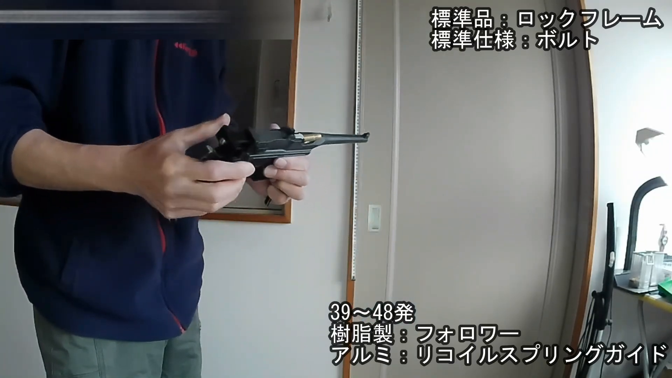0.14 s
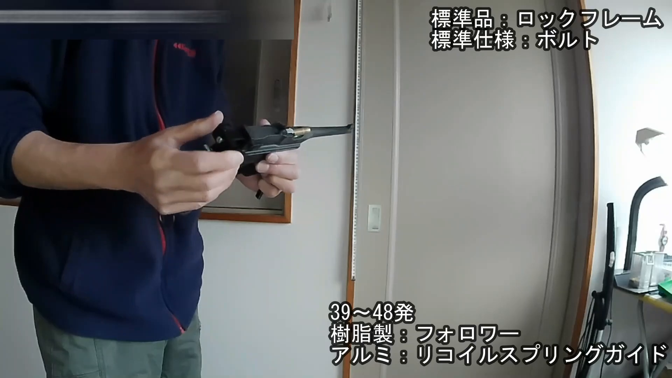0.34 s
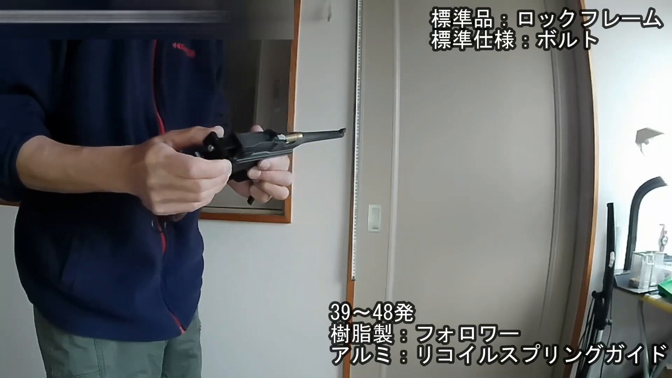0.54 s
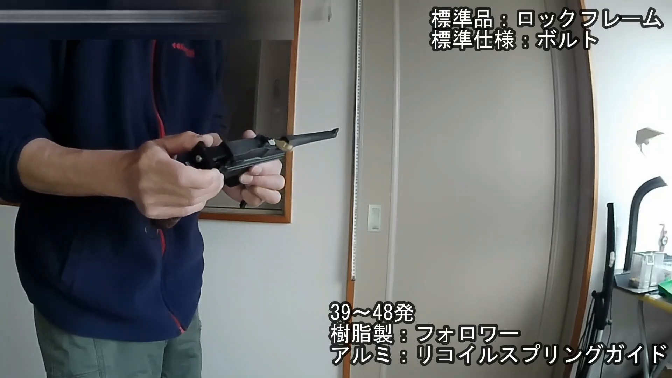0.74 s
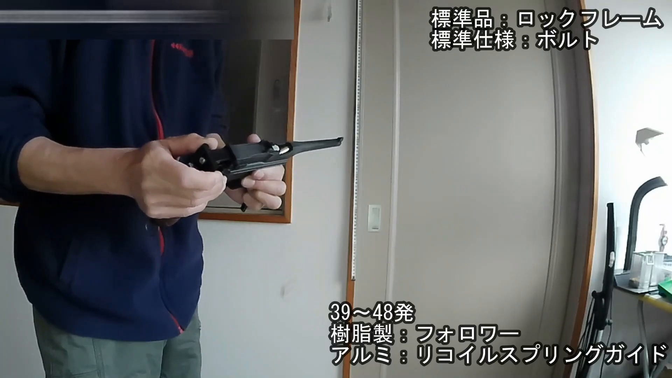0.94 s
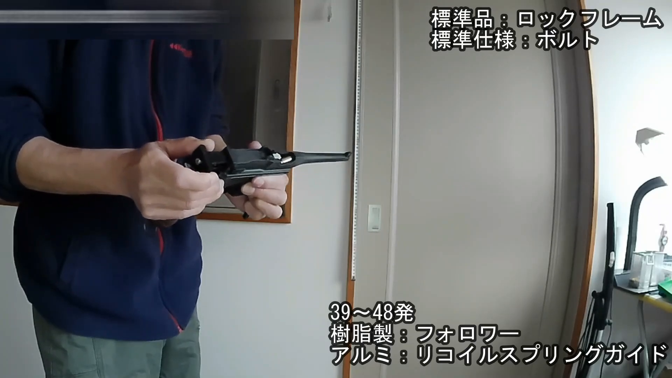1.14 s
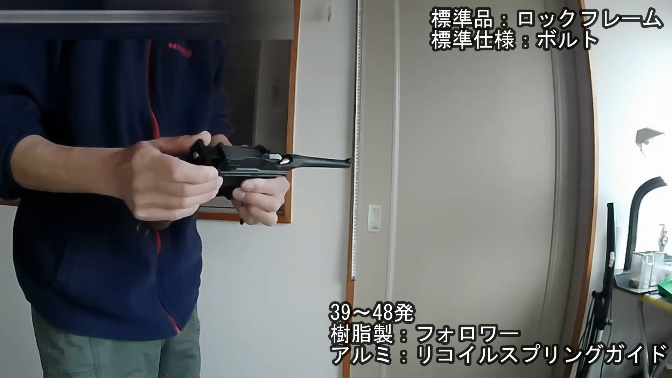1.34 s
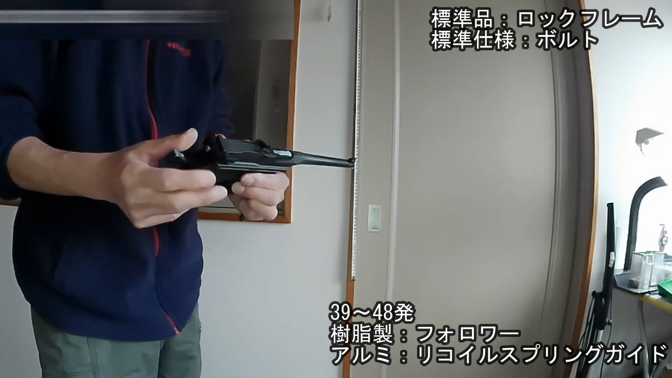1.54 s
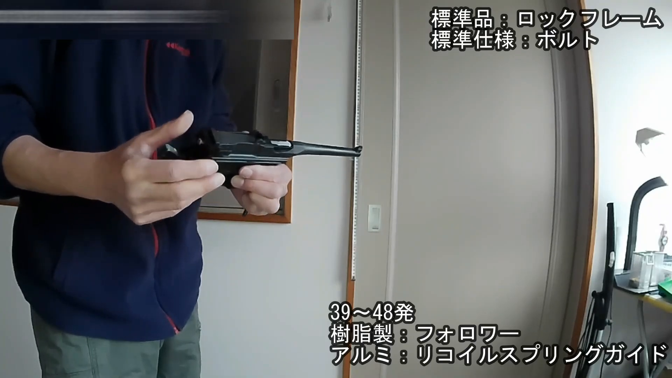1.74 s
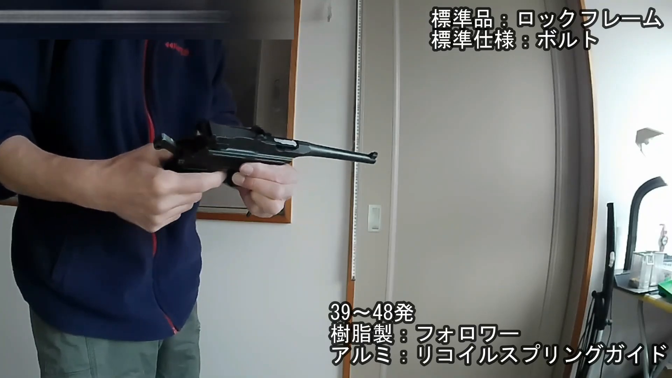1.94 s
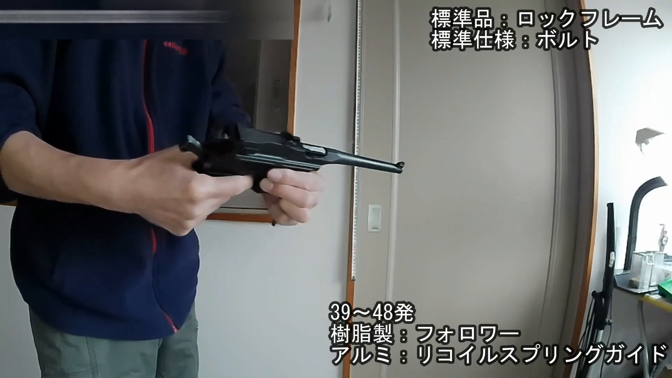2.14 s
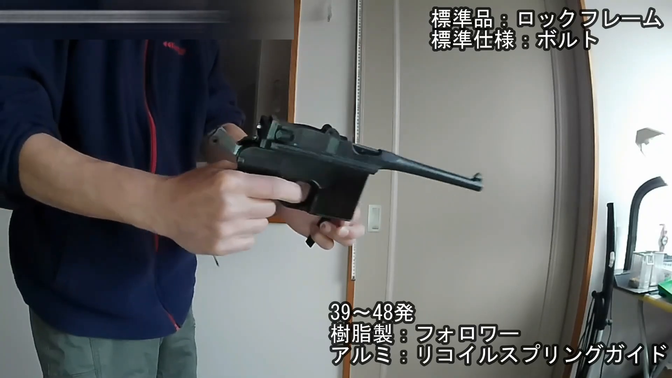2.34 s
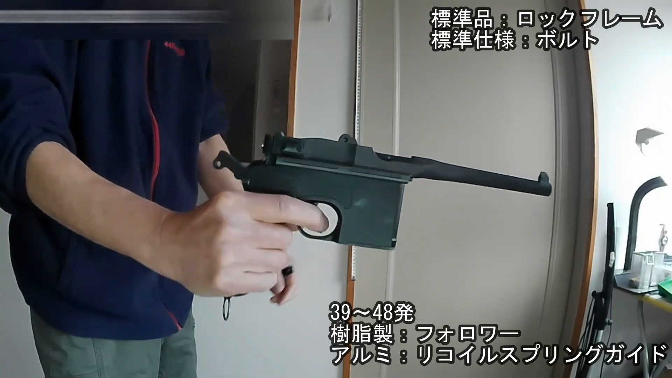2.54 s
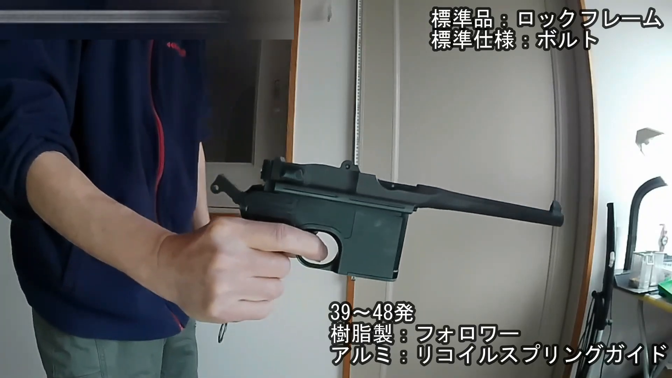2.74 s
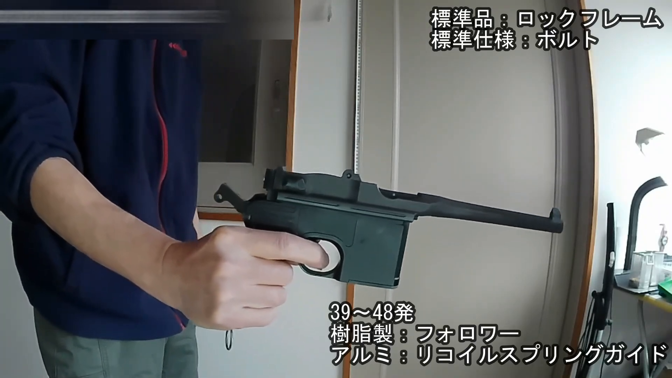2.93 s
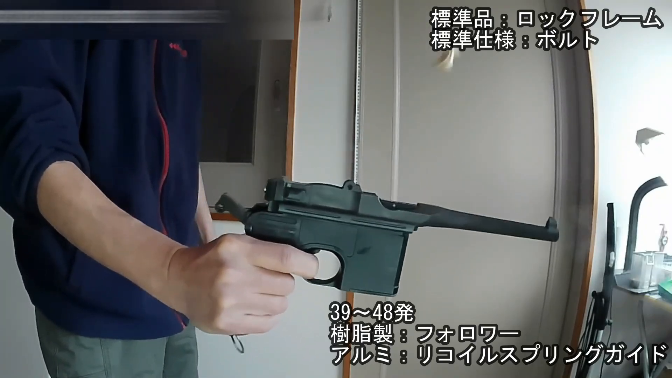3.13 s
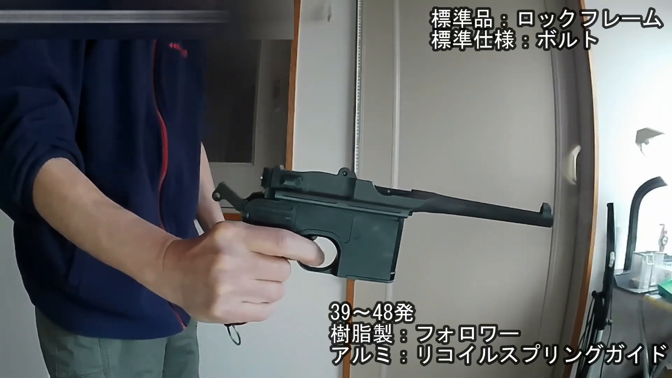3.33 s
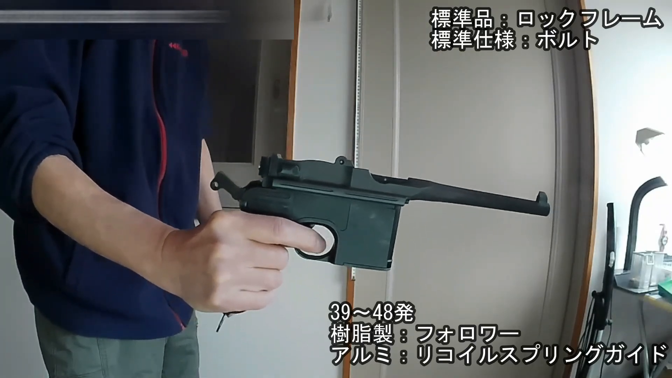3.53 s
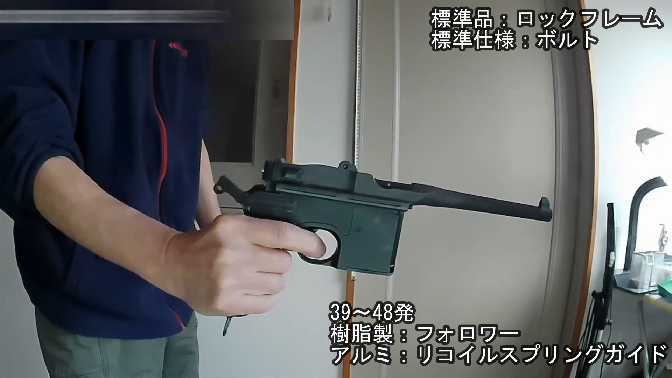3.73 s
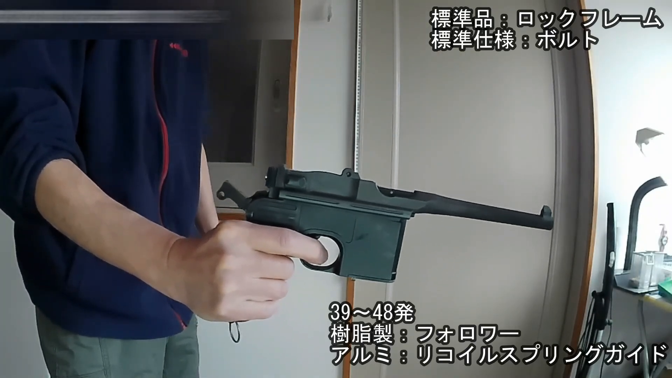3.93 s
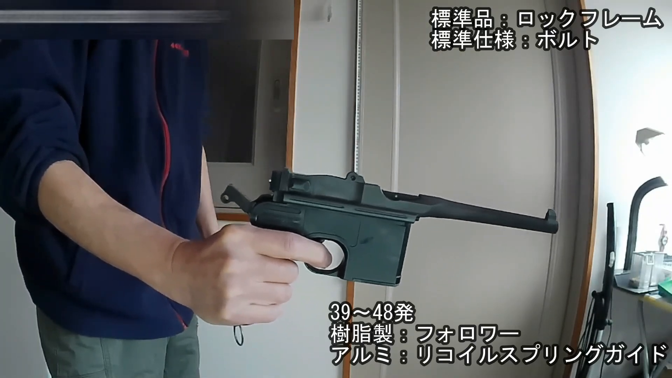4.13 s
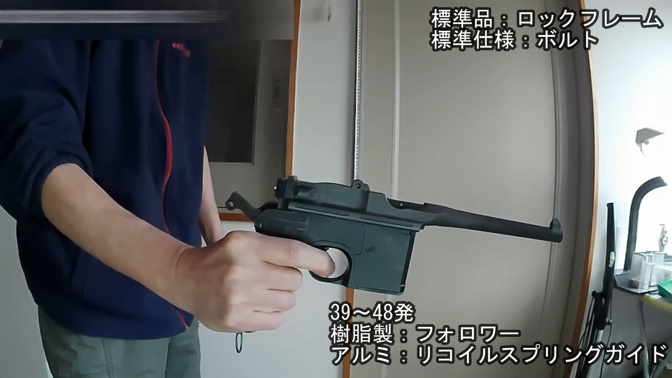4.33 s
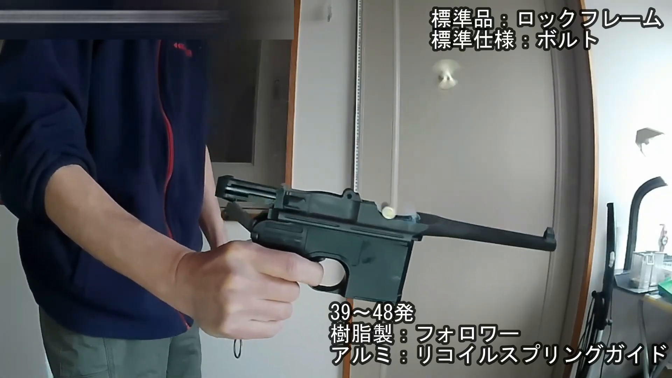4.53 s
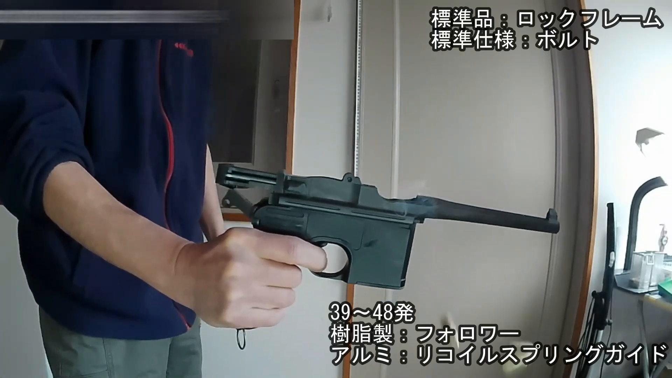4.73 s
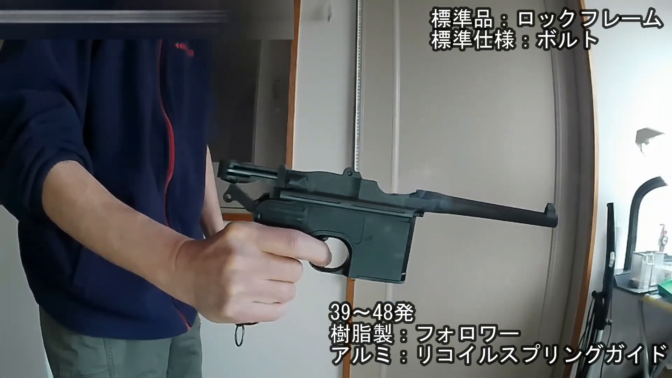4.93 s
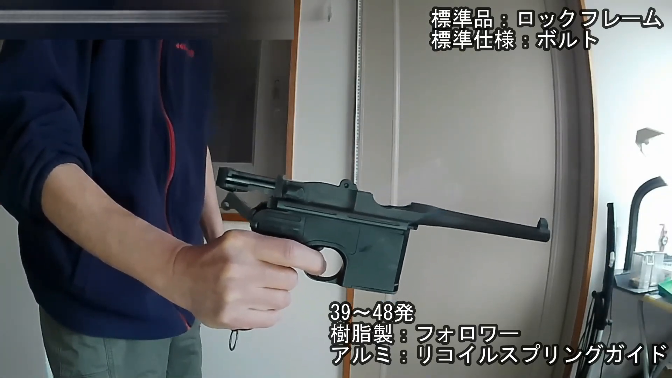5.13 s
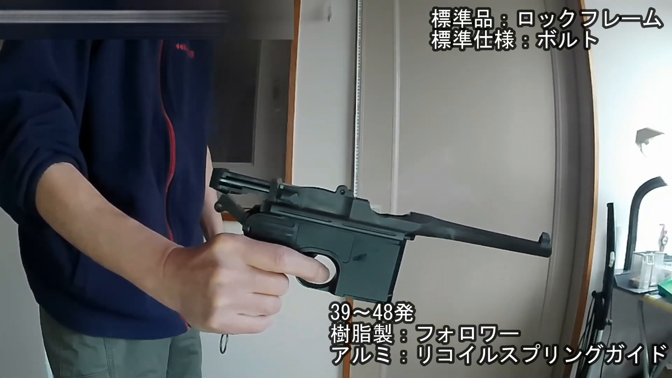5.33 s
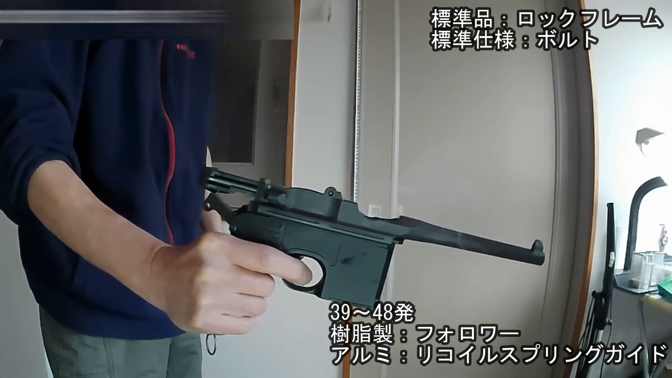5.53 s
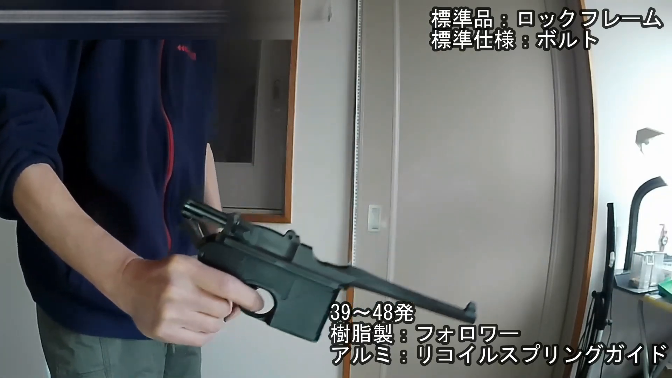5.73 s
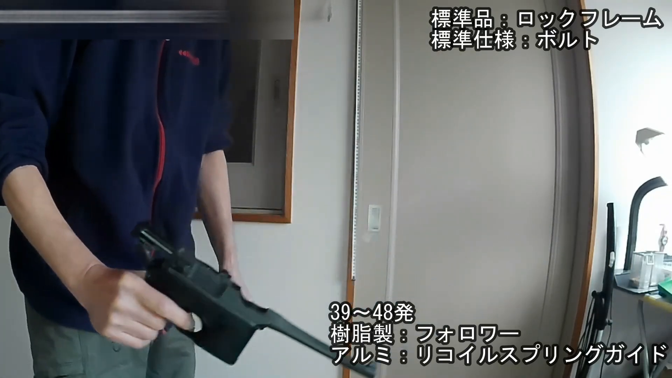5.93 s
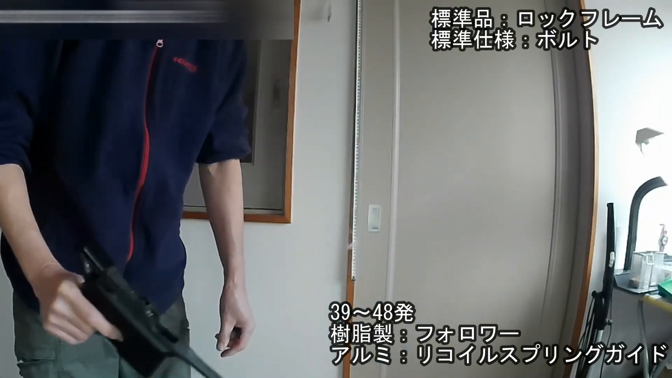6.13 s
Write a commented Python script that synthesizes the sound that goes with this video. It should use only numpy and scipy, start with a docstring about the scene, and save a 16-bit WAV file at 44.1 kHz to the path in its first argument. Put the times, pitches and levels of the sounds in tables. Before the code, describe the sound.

Close in a small furnished room, fingers tap and click over a metal pistol amid soft cloth rustle. The bolt clacks hard, pauses, scrapes lightly and snaps again. Two loud, abrupt bangs follow over a second apart, clipping the microphone and leaving a short room tail with a faint ringing panel. Light case impacts follow each shot, the second landing being a fuller clatter on floorboards.

```python
"""A cap-firing model pistol fires twice in a small furnished room: decaying gas noise and a slow pressure
push overload the microphone, the shock front fills the room and a panel rings on.
Before that the pistol is handled and cocked: fingers, bolt and hammer strike the damped modes of its body.
The ejected case lands and bounces, exciting the modes of the floor boards.
Cloth rustles as grainy noise over a low room rumble of filtered noise."""
import sys
import numpy as np
from scipy import signal
from scipy.fft import rfft, irfft, next_fast_len
from scipy.io import wavfile

SR = 44100
rng = np.random.default_rng(int(sys.argv[2]) if len(sys.argv) > 2 else 0)


def wrap_up_sound(samples):
    """Save the sound to the file named by the first command line argument, as 16-bit audio."""
    columns = np.atleast_2d(samples).T
    # keep every value between -1 and 1, then stretch to whole-number steps
    tamed = np.clip(columns, -1, 1)
    steps = np.round(tamed * 32767).astype(np.int16)
    wavfile.write(sys.argv[1], SR, steps)


def elevation(decibels):
    """Turn decibel levels (scalar or array-like) into linear amplitude ratios."""
    levels = np.asarray(decibels, float)
    return 10 ** (levels / 20)


N = 272097

# the two shots: (time [s], blast level [dB])
SHOTS = [(3.0622, 25), (4.4219, 23)]
# spectrum of the blast: (frequency [Hz], relative level per Hz [dB])
BLAST_SPECTRUM = [(35, -53.5), (60, -32), (113, -24), (189, -15.5), (371, -6.5), (700, -1.5), (1200, 0),
                  (2090, -10), (3200, -16.5), (5460, -16), (10000, -34.5), (16000, -53.5)]
# modes of the pistol's body: (frequency [Hz], relative level [dB], decay time T60 [s])
BODY_MODES = [(190, 5.5, 0.016), (272, -4.5, 0.02), (388, -8.5, 0.0061), (930, -6, 0.012),
              (1193, 0.5, 0.023), (1314, 1, 0.022), (1432, -2, 0.013), (2060, 5.5, 0.0042),
              (2350, -2.5, 0.017), (2720, -2.5, 0.011), (4500, 15.5, 0.002), (5380, -5, 0.022),
              (6940, 2.5, 0.0048), (8000, -2, 0.0026), (10300, -5.5, .004), (13200, -10, 0.0033),
              (15300, -7, .003)]
# fingers work the pistol's parts: (time [s], knock level [dB], pitch of the part touched [Hz],
# brightness = clack over knock [dB], tick level [dB])
TOUCHES = [(0.082, -32, 1200, -17.5, -71), (0.1, -24.5, 1314, -26, -59), (0.143, -34, 1430, -15.5, -49.5),
           (0.163, -36.5, 2720, 3.5, -40.5), (0.325, -41, 2720, -5, -56), (0.563, -32.5, 1430, -12, -57.5),
           (0.583, -17.5, 1380, -20, -56), (0.611, -36.5, 1370, -15, -68), (0.653, -12, 930, 1.5, -43.5),
           (0.688, -38, 2720, 8.5, -54), (0.698, -50, 2720, -12, -49), (0.758, -33, 1194, -15, -62),
           (0.783, -32, 1500, 0, -49.5), (0.826, -28.5, 1500, -2, -60), (1.03, -29, 1340, -6, -53),
           (1.045, -45, 2400, 4, -65), (1.903, -35, 1090, -34, -85), (2.294, -25, 1090, -10, -53),
           (2.343, -49.5, 2410, 4, -54), (2.395, -24.5, 1010, -12, -54), (2.64, -36, 1200, -20, -53.5)]
# highest mode of each group
THUD_HZ, KNOCK_HZ, CLACK_HZ, TICK_HZ = 600, 1700, 3200, 20000


def one(x):
    """Normalisation to unit root-mean-square value."""
    return x / np.sqrt(np.mean(x ** 2) + 1e-20)


def at_hz(points, hz):
    """Interpolation of a frequency table on a logarithmic frequency axis."""
    table = np.array(points)
    return np.interp(np.log(hz + 1), np.log(table[:, 0]), table[:, 1])


def colour(x, points):
    """Minimum-phase filtering: folding the cepstrum makes the given spectrum causal."""
    size = next_fast_len(N + SR)
    gain = elevation(at_hz(points, np.fft.rfftfreq(size, 1 / SR)))
    cepstrum = irfft(np.log(gain), size)
    cepstrum[1:size // 2] *= 2
    cepstrum[size // 2 + 1:] = 0
    response = np.exp(rfft(cepstrum))
    return irfft(rfft(x, size) * response, size)[:N]


def clicks(times, db):
    """Ideal impulses: each places its whole force in one sample."""
    out = np.zeros(N) + 1e-18
    out[np.round(np.array(times) * SR).astype(int)] = elevation(db)
    return out


def ring(x, hz, t60):
    """Damped resonator: a unit impulse starts a decaying sine of height 1."""
    radius = elevation(-60 / (t60 * SR))
    angle = 2 * np.pi * hz / SR
    return signal.lfilter([0, np.sin(angle)], [1, -2 * radius * np.cos(angle), radius ** 2], x)


def gas_hiss(burn_s):
    """Turbulent jet noise: burning cap gas hisses at the microphone and dies exponentially."""
    t = np.arange(N) / SR
    envelope = np.zeros(N)
    for s, db in SHOTS:
        age = np.maximum(t - s, 0)
        envelope += elevation(db) * (t > s) * np.exp(-age / burn_s)
    return envelope * one(colour(rng.standard_normal(N), BLAST_SPECTRUM))


def pressure_push(push_db, push_s):
    """Blast-wave pressure: a slow positive push swings back below zero and recovers."""
    t = np.arange(N) / SR
    push = np.zeros(N)
    for s, db in SHOTS:
        age = np.maximum(t - s, 0) / push_s
        push += elevation(db + push_db) * age * (2 - age) * np.exp(-age)
    return push


def shock_front(front_db):
    """Impulsive shock radiation: one coloured click per shot, which excites the room."""
    return elevation(front_db) * colour(clicks(*np.transpose(SHOTS)), BLAST_SPECTRUM)


def panel_hum():
    """Modal resonance: a panel in the room, struck by each blast, rings on."""
    # modes of the panel: (frequency [Hz], level relative to the blast [dB], decay time T60 [s])
    panel_modes = [(895, -67, 1.8), (851, -57, .6), (1476.5, -56, .6), (1570, -64, .6)]
    blast = clicks(*np.transpose(SHOTS))
    return sum(ring(blast * elevation(db), hz, t60) for hz, db, t60 in panel_modes)


def strike(blows, modes, thud_db, knock_db, clack_db, tick_db, rattle_s, focus_db=np.zeros((0, 1))):
    """Modal excitation: soft contact moves low modes, hard points rattle on high ones; gives body, tick."""
    s, knock, thud, clack, tick = np.transpose(blows)
    # every blow strikes the modes with fresh strengths
    spread = rng.normal(0, 2.5, (len(s), len(modes)))
    spread[:len(focus_db)] += focus_db
    groups = [thud + thud_db, knock + knock_db, clack + clack_db, tick + tick_db]
    top = [THUD_HZ, KNOCK_HZ, CLACK_HZ, TICK_HZ]
    out = np.zeros((len(top), N))
    fade = np.exp(-1 / (rattle_s * SR))
    for k, (hz, level_db, t60) in enumerate(modes):
        group = np.searchsorted(top, hz)
        force = clicks(s, groups[group] + level_db + spread[:, k])
        if hz > CLACK_HZ:     # the energy of the blow comes as a dying spray of tiny touches
            force = signal.lfilter([np.sqrt(1 - fade ** 2)], [1, -fade], force)
            force = force * rng.standard_normal(N)
        out[group] += ring(force, hz, t60)
    # a contact of finite length has no sound far above the modes it moves
    soft = [signal.sosfilt(signal.butter(7, hz, fs=SR, output="sos"), v) for hz, v in zip(top, out)]
    # small things push little air in the deep bass
    bass_cut = signal.butter(4, 140.0, "high", fs=SR, output="sos")
    return signal.sosfilt(bass_cut, sum(soft[:3])), soft[3]


def pistol_blows():
    """Contact mechanics: each contact as (time [s], knock, thud, clack, tick [dB]), finger touches first."""
    # the hammer drops on the firing pin and touches twice:
    # (time before the bang [s], knock [dB], thud [dB], clack [dB], tick [dB])
    hammer = [(.0125, -14, -45, -26, -38), (.0107, -13, -45, -24, -33)]
    # the bolt hits its stops: (time [s], knock [dB], brightness = clack over knock [dB],
    # weight = thud over knock [dB])
    bolt = [(1.2702, 5.5, -10, -14), (1.4299, -9, -8, -15), (1.4330, 3.5, -20, -28),
            (1.434, -10.5, 7.5, -21.5), (1.446, -18.5, -4, -27)]
    # the sliding bolt catches on a small metal edge: (time [s], tick [dB], clack over tick [dB])
    catches = [(1.36, -31.5, -22), (1.411, -35.5, -14), (1.4288, -17, -5.5)]
    # the grip thumps in the hand: (time [s], thud [dB])
    thumps = [(1.494, -23.5), (1.537, -26.5)]
    # a finger moves the low modes little
    rows = [(s, db, db - 33.5, db + bright, tick) for s, db, _, bright, tick in TOUCHES]
    # the tick of the bolt follows its brightness
    rows += [(s, db, db + weight, db + bright, db + bright - 14.5) for s, db, bright, weight in bolt]
    rows += [(s, db - 10.5, db - 7.5, db + clack, db) for s, db, clack in catches]
    rows += [(s, db - 19, db, db - 40, db - 40) for s, db in thumps]
    rows += [(s - lead, *levels) for s, _ in SHOTS for lead, *levels in hammer]
    return rows


def touch_focus_db():
    """Local excitation: knock and clack modes far from the pitch of the touched part move less."""
    db_per_octave = 17.5
    pitch = np.transpose(TOUCHES)[2][:, None]
    hz = np.transpose(BODY_MODES)[0]
    return -db_per_octave * np.abs(np.log2(hz / pitch)) * (hz > THUD_HZ) * (hz < CLACK_HZ)


def pistol_parts():
    """Structure-borne sound: contacts on the pistol set the modes of its body ringing."""
    return strike(pistol_blows(), BODY_MODES, thud_db=-4.5, knock_db=-15.0, clack_db=-9.0, tick_db=-3.5,
                  rattle_s=0.0055, focus_db=touch_focus_db())


def case_on_floor():
    """Impact sound: the spent case lands and bounces; a harder contact excites higher board modes."""
    # landings and bounces: (time [s], thud [dB], hardness = knock over thud [dB], tick [dB])
    landings = [(3.722, -23, 27, -38), (3.985, -23.5, -13.5, -40.5), (4.017, -28, -21, -68.5),
                (4.144, -32.5, -6.5, -47.5), (4.192, -35, -17, -53), (5.0536, -13.5, 11, -45),
                (5.061, -10.5, 3.5, -48), (5.079, -16.5, 4.5, -38.5), (5.093, -6.5, -0.5, -44.5),
                (5.105, -14.5, 2, -46), (5.259, -23, -20.5, -62), (5.31, -26.5, -11, -55),
                (5.334, -30, -18, -55.5), (5.376, -34, -19.5, -63), (5.424, -30, -7, -59)]
    # modes of the floor boards: (frequency [Hz], relative level [dB], decay time T60 [s])
    board_modes = [(186, -3, 0.029), (223, -0.5, 0.021), (330, 3, 0.047), (397, -2.5, 0.042),
                   (545, -4, 0.0041), (654, 0.5, 0.0044), (1060, -4.5, 0.0074), (1210, 2.5, 0.0084),
                   (1711, 10, 0.0073), (2248, -4.5, 0.0058), (2580, -10, 0.0031), (4450, -1.5, 0.0011),
                   (6000, 1.5, 0.0019), (7000, -7, 0.0046), (8670, -8, 0.0014), (12310, -6, 0.0016)]
    # the clack grows with hardness
    blows = [(s, db + hard, db, db + 1.106 * hard - 10, tick) for s, db, hard, tick in landings]
    return strike(blows, board_modes, thud_db=-8.0, knock_db=-2.0, clack_db=0.0, tick_db=4.5,
                  rattle_s=0.00069)


def rustle(grain_db):
    """Friction noise: dense grains of uneven size follow the movement of cloth and hands."""
    # one list for each stretch of movement: (time [s], level [dB])
    movements = [
        [(0.0, -56.5), (0.26, -50), (0.396, -56.5), (0.692, -74.5), (1.028, -65), (1.22, -65)],
        [(1.72, -85), (1.948, -60.5), (2.08, -57), (2.204, -55), (2.674, -65.5), (3.0, -61)],
        [(5.55, -58), (5.634, -62), (6.17, -60)],
    ]
    # spectrum of the cloth: (frequency [Hz], relative level per Hz [dB])
    cloth_spectrum = [(71, -40), (120, -15.5), (264, 8), (680, 2.5), (1310, -2.5), (3180, -17.5),
                      (7560, -23.5), (12000, -58), (15600, -60), (22000, -120)]
    envelope, t = np.zeros(N), np.arange(N) / SR
    for rows in movements:
        s, db = np.transpose(rows)
        envelope += elevation(np.interp(t, s, db, left=-120, right=-120))
    sizes = np.repeat(rng.standard_normal(N // 100 + 1), 100)[:N]     # one size per 100 samples
    grains = rng.standard_normal(N) * elevation(grain_db * sizes)
    return envelope * one(colour(grains, cloth_spectrum))


def room(tail_db, onset_s, rise_s, smear_s, late_db, late_t60):
    """Reverberation: impulse response of scattered echoes, then noise dying band by band, no direct sound."""
    # reverberation time: (frequency [Hz], T60 [s])
    room_t60 = [(60, 0.22), (150, .35), (400, 0.33), (1000, 0.27), (2500, 0.27), (5000, 0.24), (9000, 0.22),
                (16000, 0.047)]
    # first reflections: (delay [s], relative level [dB])
    echoes = [(.0073, -4.5), (.0098, -5.5), (0.013, -12.5)]
    # late faint tail through an open door: (frequency [Hz], relative level per Hz [dB])
    next_room = [(150, -27), (500, -4.5), (900, -4), (1500, 0), (2500, -10.5), (6000, -16.5)]
    t = np.arange(SR) / SR
    tail = 0
    edges = 40 * 2 ** np.arange(0, 9.1, .5)     # half-octave bands [Hz]
    for low, high in zip(edges, edges[1:]):
        band_filter = signal.butter(2, [low, high], "band", fs=SR, output="sos")
        band = signal.sosfilt(band_filter, rng.standard_normal(SR))
        tail = tail + band * elevation(-60 * t / at_hz(room_t60, np.sqrt(low * high)))
    late = one(colour(rng.standard_normal(N), next_room))[:SR]
    tail = tail * elevation(tail_db) + elevation(late_db - 60 * t / late_t60) * late
    out = tail * np.clip((t - onset_s) / rise_s, 0, 1)
    for s, db in echoes:      # furniture breaks each echo into a short burst
        burst = rng.standard_normal(SR) * (t > s) * np.exp(-np.abs(t - s) / smear_s)
        out += elevation(db) * burst / np.sqrt(np.sum(burst ** 2))
    return out


def rumble(level_db):
    """Stationary background noise: random noise shaped by the room's low-frequency spectrum."""
    # spectrum of the rumble: (frequency [Hz], relative level per Hz [dB])
    rumble_spectrum = [(8.8, -39.5), (15, -2.5), (43, -0.5), (59, -14.5), (95, -12), (124, -20.5),
                       (166, -21), (316, -26), (584, -34.5), (739, -30.5), (8410, -50.5), (15100, -54.5),
                       (16500, -53.5)]
    return elevation(level_db) * one(colour(rng.standard_normal(N), rumble_spectrum))


def scene():
    """Superposition of direct and reverberant sound; ticks are beamed and send the walls a smaller share."""
    front = shock_front(front_db=29.0)
    bang = gas_hiss(burn_s=0.0018) + pressure_push(push_db=-4.0, push_s=0.0058) + panel_hum()
    parts, parts_tick = pistol_parts()
    case, case_tick = case_on_floor()
    walls = room(tail_db=-25.5, onset_s=0.00043, rise_s=0.0094, smear_s=0.0011, late_db=-72.5, late_t60=.75)
    sent = front + elevation(-3.0) * parts + elevation(-11.5) * parts_tick
    sent = sent + elevation(-1.5) * case + elevation(-2.0) * case_tick
    wet = signal.fftconvolve(sent, walls)[:N]
    direct = bang + parts + parts_tick + case + case_tick
    return (direct + wet + rustle(grain_db=1.5) + rumble(level_db=-45))[None]


def band_limit(x):
    """A steep low-pass at the top of the band."""
    return signal.sosfilt(signal.butter(12, 16640, fs=SR, output="sos"), x)


def record(dry):
    """Hard overload clips the peaks, then a coupling capacitor (9 Hz high-pass) lets flat tops sag."""
    clipped = np.clip(dry, -.96, .96)
    mix = signal.lfilter([1, -1], [1, -np.exp(-2 * np.pi * 9 / SR)], clipped)
    return band_limit(mix)


dry = scene()
out = record(dry)
wrap_up_sound(out)
```